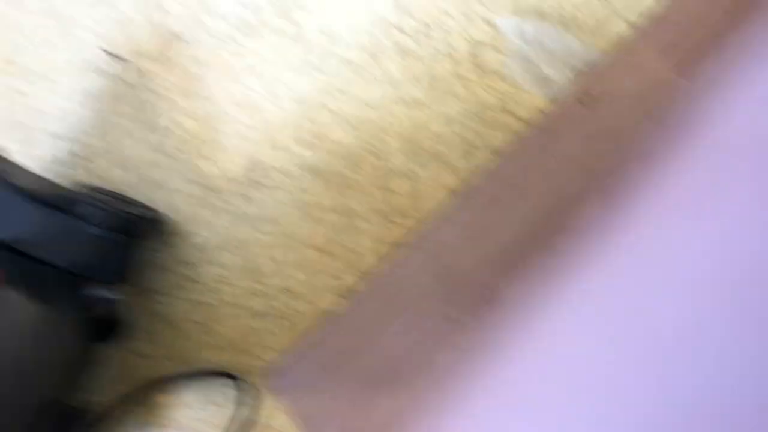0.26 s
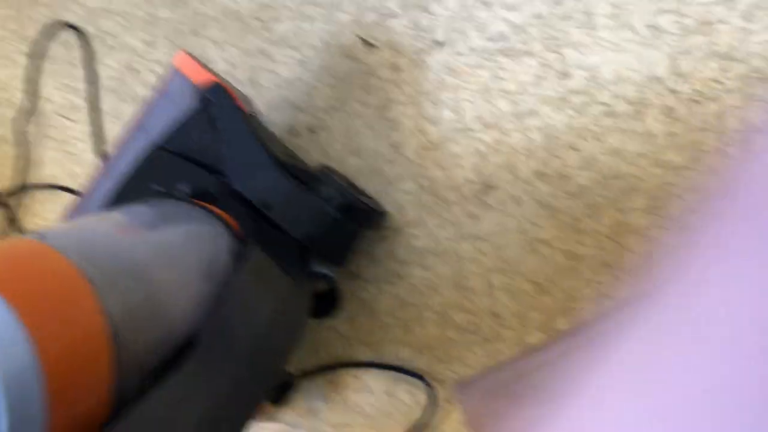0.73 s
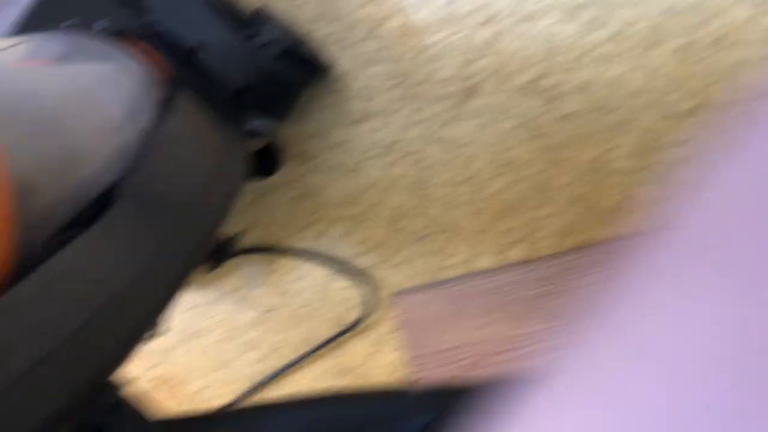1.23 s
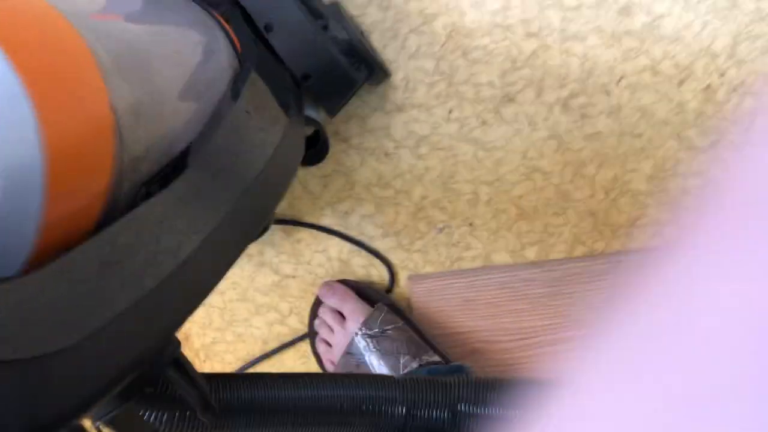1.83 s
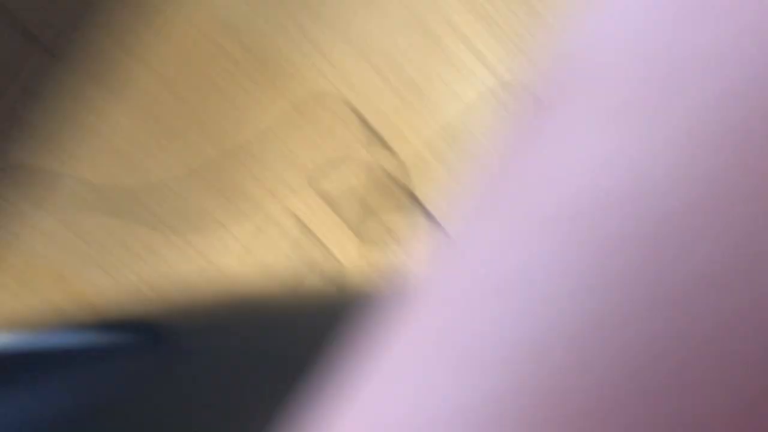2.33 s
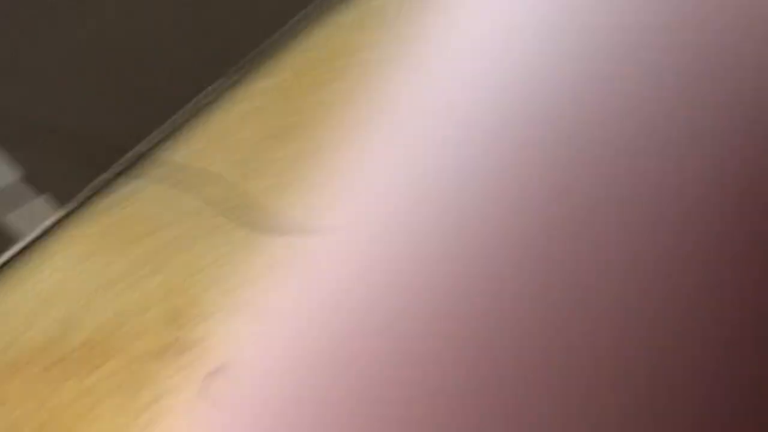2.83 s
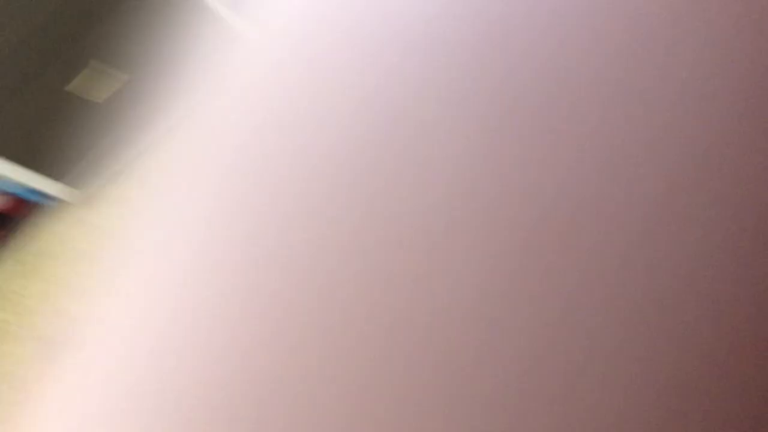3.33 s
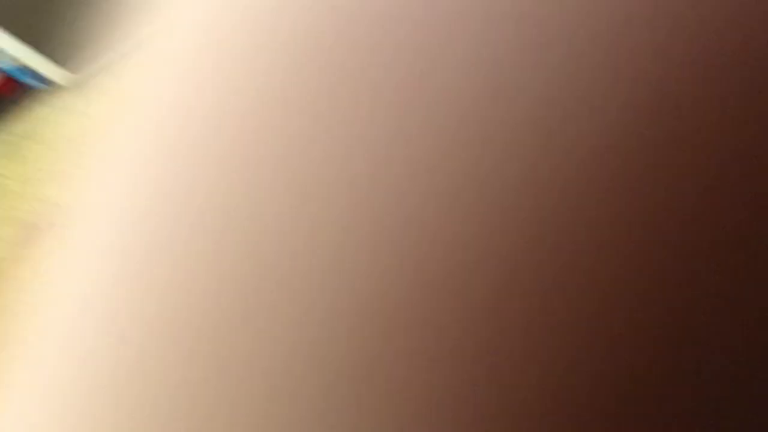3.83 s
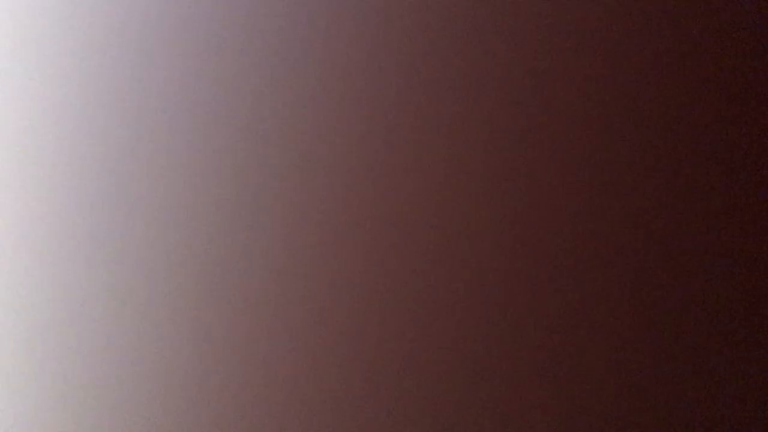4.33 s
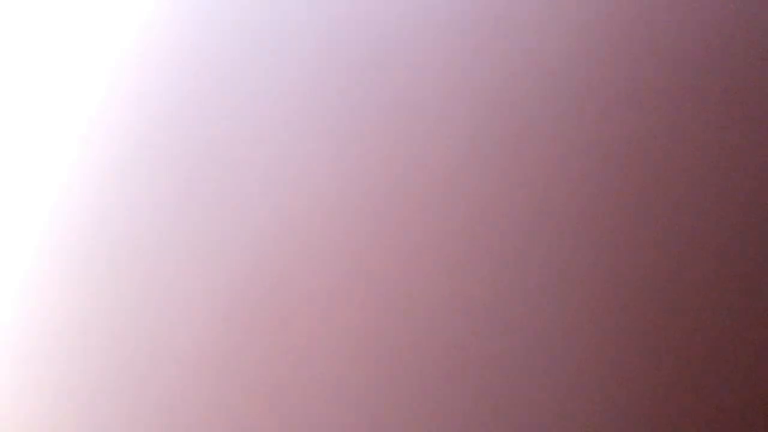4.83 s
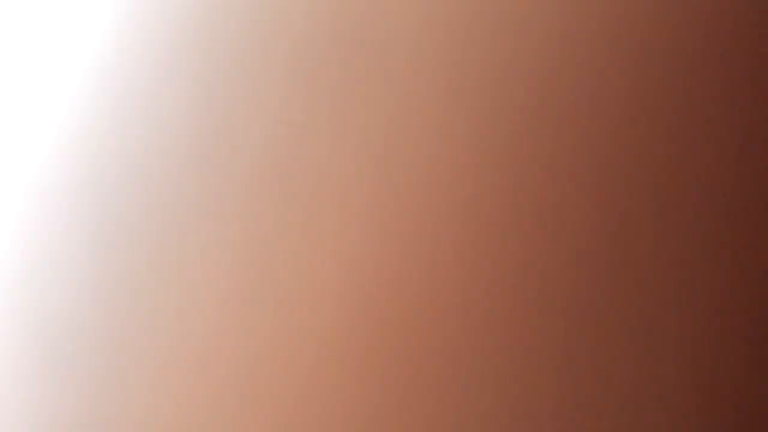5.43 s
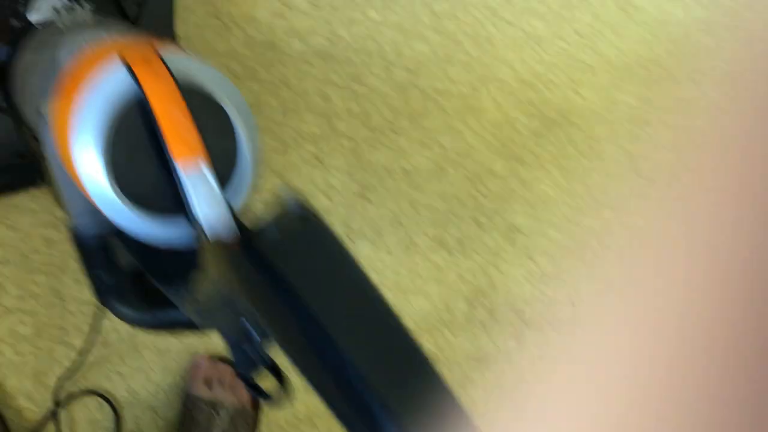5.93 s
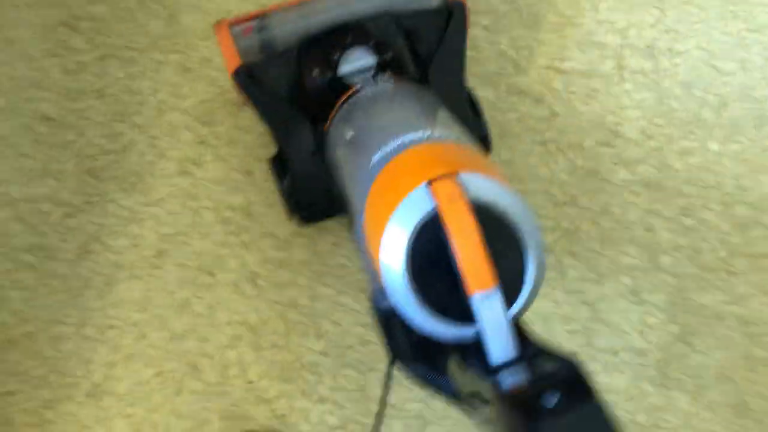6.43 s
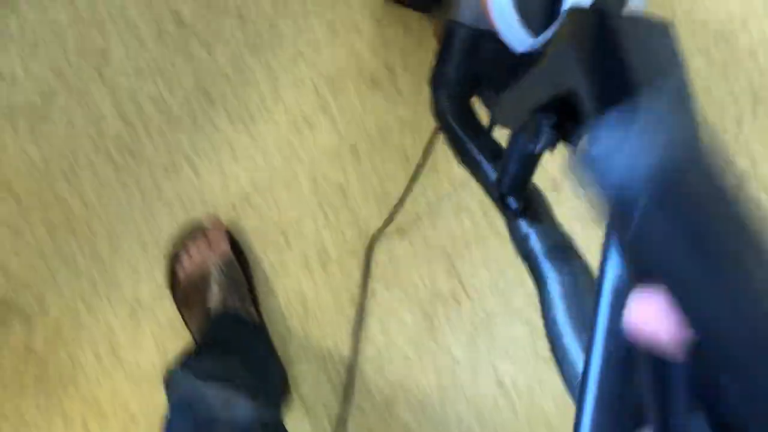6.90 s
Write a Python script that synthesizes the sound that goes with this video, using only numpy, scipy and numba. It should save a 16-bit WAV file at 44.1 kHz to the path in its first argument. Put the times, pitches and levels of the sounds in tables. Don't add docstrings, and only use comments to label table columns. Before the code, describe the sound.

Close, essentially mono sound of a vacuum cleaner already running indoors. Its motor tone swells first, with thin high whines flickering above a broad airy roar and faint rattling hum. One bright grit tick snaps inside the plastic bin. The microphone then turns into the exhaust, bringing coarse rushing hiss and hollow whistles; the handle knocks, the jet swings away, and the motor continues.

```python
import sys
import numpy as np
from scipy import signal
from scipy.fft import rfft, irfft
from scipy.io import wavfile
from scipy.ndimage import uniform_filter1d
from numba import njit

SR = 44100
rng = np.random.default_rng(int(sys.argv[2]) if len(sys.argv) > 2 else 0)


def unload_wav(signal):
    wavfile.write(
        sys.argv[1],
        SR,
        np.round(np.clip(np.atleast_2d(signal).T, -1, 1) * 32767).astype(np.int16),
    )


def nominal_scale(level):
    x = np.asarray(level, float) / 20
    return 10 ** x


N = 315756
TIME = np.arange(N) / SR
BINS_HZ = np.maximum(np.arange(N // 2 + 1) * SR / N, 1)


def curves(table):
    time_s, *columns = np.transpose(table)
    return [np.interp(TIME, time_s, column) for column in columns]


def unit(x):
    return x / np.sqrt(np.mean(x ** 2))


def walk(rate_hz):
    hold = int(SR / rate_hz)
    steps = np.repeat(rng.standard_normal(N // hold + 1), hold)
    slewed = uniform_filter1d(uniform_filter1d(steps, hold), hold)
    return unit(slewed[:N])


def bell(centre_s, half_s):
    return np.exp(-.5 * ((TIME - centre_s) / half_s) ** 2)


def swells(table, floor_db):
    bells = sum(nominal_scale(level_db) * bell(centre_s, half_s) for centre_s, half_s, level_db in table)
    return 20 * np.log10(nominal_scale(floor_db) + bells)


def fade(depth_db, rate_hz):
    return depth_db * np.minimum(walk(rate_hz), .7)


def tone(pitch_hz, level_db):
    cycles = np.cumsum(pitch_hz * np.ones(N)) / SR + rng.random()
    return np.sqrt(2) * nominal_scale(level_db) * np.sin(2 * np.pi * cycles)


@njit
def svf(x, centre_hz, width_hz):
    y, b, l = np.empty(len(x)), 0., 0.
    for i in range(len(x)):
        g = np.tan(np.pi * centre_hz[i] / SR)
        k = width_hz[i] / centre_hz[i]
        v = (b + g * (x[i] - l)) / (1 + g * (g + k))
        b, l, y[i] = 2 * v - b, l + 2 * g * v, k * v
    return y


def band(x, centre_hz, width_hz):
    centre_hz = np.clip(centre_hz, 20, .45 * SR) * np.ones(len(x))
    width_hz = width_hz * np.ones(len(x))
    return svf(svf(x, centre_hz, width_hz), centre_hz, width_hz)


# pitch_hz, density_db_per_hz
ROAR = [(25, -86), (48, -101), (90, -74.5), (170, -67), (600, -57.5), (800, -61.5), (1300, -63),
        (2400, -69), (3400, -67), (4700, -66), (6500, -70.5), (9000, -77.5), (12000, -83), (15800, -83.5)]
# time_s, nearness_db, shade_db (of hand and body)
PHONE = [(0, 0.5, 1), (.12, 0.5, 1), (.6, -0.5, 0), (1.4, 0.5, -0.5), (2.2, -2.5, 1), (2.75, 0, -3.5),
         (3.25, -3.5, -2.5), (3.6, 0, 1), (3.85, -1, -1.5), (4.3, -0.5, 3.5), (4.55, 3, 1.5),
         (5.4, 3.5, 0.5), (5.86, 2.5, 2), (6.05, -1.5, 2.5), (6.24, 1, -1.5), (6.6, 0, 1.5), (6.95, 1, 1),
         (7.16, -1.5, 4.5)]


def roar():
    octave = np.log2(BINS_HZ)
    pitch_hz, density_db = np.transpose(ROAR)
    colour = nominal_scale(np.interp(octave, np.log2(pitch_hz), density_db)) * np.sqrt(SR / 2)
    air = rfft(rng.standard_normal(N)) * colour
    near_db, shade_db = curves(PHONE)
    path_octave = np.log2([250, 1250, 3500, 11000])
    near_share, shade_share = (.23, .99, .59, .15), (-.036, -.041, .47, .94)
    drift_db_per_s = (.72, 0, 0, 0)
    reach_db = np.outer(near_share, near_db) + np.outer(shade_share, shade_db)
    reach_db += np.outer(drift_db_per_s, TIME - TIME[-1] / 2)
    out = np.zeros(N)
    for centre in np.arange(4.5, 14.6, .5):
        path_mix = [np.interp(centre, path_octave, row) for row in np.eye(4)]
        part = irfft(air * np.clip(1 - 2 * abs(octave - centre), 0, 1), N)
        flicker_db = .79 * walk(2.17) + 1.16 * walk(9)
        out += part * nominal_scale(path_mix @ reach_db + flicker_db)
    return out


HUM_HZ = (112.6, 119.9, 59.2, 1102, 225.4)
# centre_s, half_s, level_db
BELT = [(.3, 0.16, -33.5), (.8, 0.22, -36.5), (1.4, 0.14, -44.5), (2.42, 0.047, -43), (2.85, .15, -49),
        (3.55, 0.18, -41.5), (4.58, 0.1, -40), (5.2, 0.29, -44.5), (5.73, 0.12, -45), (6.7, 0.35, -40.5)]
# centre_s, half_s, level_db
MAINS = [(0, 0.17, -37), (1.15, .1, -51), (2.5, 0.27, -48), (3.2, 0.17, -45), (4.2, 0.22, -47),
         (4.87, 0.12, -46), (6.05, .15, -46), (6.85, .25, -44)]
# centre_s, half_s, level_db
BRUSH = [(.1, .2, -54), (.6, .15, -53), (1.3, .2, -56), (1.75, .15, -60), (2.58, .12, -59), (3.4, .15, -61),
         (4.85, .15, -62), (5.75, .2, -59), (6.85, .1, -60)]
# centre_s, half_s, level_db
MIX = [(.1, 0.16, -41), (1.5, 0.64, -40.5), (2.85, .1, -46), (4.3, 0.13, -42.5), (5.16, .1, -46),
       (7.05, .2, -44)]
# centre_s, half_s, level_db
BELT_TWICE = [(1.75, 0.16, -48), (2.55, 0.37, -48.5), (3.9, 0.22, -43), (4.95, 0.21, -46), (6.3, 0.19, -48)]
# pitch_hz, level_db
SIDE_LINES = [(338, -49), (429.5, -46), (604.5, -44), (869.4, -48), (1276, -49), (1707, -56)]


def hum():
    floor_db = -60
    levels_db = (swells(BELT, floor_db),
                 swells(MAINS, floor_db),
                 swells(BRUSH, -72),
                 swells(MIX, -54) + fade(2.8, 9),
                 swells(BELT_TWICE, floor_db))
    out = sum(tone(pitch_hz, level_db) for pitch_hz, level_db in zip(HUM_HZ, levels_db))
    for pitch_hz, level_db in SIDE_LINES:
        out += tone(pitch_hz + .885 * walk(3), level_db + fade(4.7, 5.5))
    return out


# time_s, level_db, centre_hz, notch_hz (of the hand's shadow, also setting the
JET = [(2.9, -38.5, 5770, 3250), (3.39, -35, 5700, 3100), (3.45, -27.5, 5300, 3000),
       (3.69, -30.5, 6500, 2880), (3.82, -28, 6400, 2800), (4.02, -28.5, 4700, 2560),
       (4.25, -34.5, 5540, 2390), (4.45, -30.5, 5500, 2420), (4.85, -30.5, 5500, 2450),
       (5.4, -29.5, 5800, 2380), (5.65, -26, 5660, 2300), (5.73, -22.5, 5300, 2500),
       (5.9, -20.5, 5600, 2700), (5.97, -25.5, 5200, 2800), (6.16, -42, 4900, 2900), (6.4, -45, 4900, 2900),
       (6.95, -28.5, 4800, 2900), (7.16, -50, 5000, 2900)]


def jet():
    level_db, centre_hz, _ = curves(JET)
    level_db = level_db - 25 * np.clip(JET[0][0] - TIME, 0, 1)
    hits = rng.random(N) < .05
    dust = hits * nominal_scale(2.5 * rng.exponential(size=N)) * rng.standard_normal(N)
    air = rng.standard_normal(N) + .22 * unit(dust)
    top_edge_hz, patch_hz = 8540, 800
    hiss = rfft(band(air, centre_hz, .89 * centre_hz)) / (1 + (BINS_HZ / top_edge_hz) ** 9)
    out = np.zeros(N)
    for k in range(1, 16):
        patch = irfft(hiss * np.clip(1 - abs(BINS_HZ / patch_hz - k), 0, 1), N)
        out += patch * nominal_scale(1.5 * walk(6))
    return unit(out) * nominal_scale(level_db)


# centre_s, half_s, centre_hz, width_hz
WHISTLE = [(3.12, .12, 13500, 2000), (3.59, .045, 10000, 6000), (4.38, .12, 13200, 2500),
           (4.5, .1, 9200, 1200), (4.7, .7, 600, 70), (4.9, .8, 172, 30), (6.5, .15, 630, 100),
           (5.15, .35, 7200, 1200), (4.57, .1, 4750, 500), (4.9, .5, 3400, 500), (6.9, .3, 10000, 4000),
           (3.55, .06, 6000, 1600), (5.85, .06, 5700, 2000), (4.12, .12, 3400, 800), (5.45, .12, 6600, 500),
           (1.45, .35, 186, 25), (3.8, .3, 1900, 600), (4.1, .12, 680, 150), (3.52, .06, 4600, 900),
           (6.35, .18, 1100, 500), (4.95, .45, 1500, 900), (5.76, .06, 3900, 900), (5.68, .1, 340, 120),
           (5.8, .08, 8200, 2000)]
WHISTLE_DB = [-52, -38, -44, -45, -34, -43.5, -32, -36, -31, -36.5, -41, -29, -25, -36, -36, -45.5, -39,
              -32, -33, -36, -38, -33, -34, -38.5]


def whistles():
    out = np.zeros(N)
    for (centre_s, half_s, centre_hz, width_hz), peak_db in zip(WHISTLE, WHISTLE_DB):
        ring = unit(band(rng.standard_normal(N), centre_hz, width_hz))
        out += nominal_scale(peak_db) * bell(centre_s, half_s) * ring
    return out


def near_echo(x):
    notch_hz = curves(JET)[2]
    from_s, to_s, ease_s = 3.1, 5.62, .076
    share = .29 * np.clip(np.minimum(TIME - from_s, to_s - TIME) / ease_s, 0, 1)
    dull = band(x, 1.7 * notch_hz, 2.6 * notch_hz)
    late = np.interp(np.arange(N) - 2 * SR / notch_hz, np.arange(N), dull)
    cancelled = svf(x, notch_hz, .3 * notch_hz)
    return x - share * (1.15 * cancelled + .5 * late)


# start_s, level_db, centre_hz, width_hz, t60_s
TICKS = [
    (1.1564, -19, 14000, 9000, .007),
    (2.2519, -11, 3800, 7000, .011),
    (2.2522, -19, 13000, 8000, .008),
    (2.2550, -22, 10500, 2500, .008),
    (2.2675, -24, 9000, 9000, .008),
    (.48, -31, 11000, 6000, .01),
]
# start_s, level_db, centre_hz, width_hz, t60_s
BUMP = [
    (5.726, -16.5, 750, 900, .28),
    (5.727, -24, 2200, 2500, .22),
    (5.738, -25, 215, 120, .35),
    (2.55, -42, 95, 50, .35),
]


def knocks(table, rise_s):
    out = np.zeros(N)
    t = np.arange(SR // 2) / SR
    for start_s, level_db, centre_hz, width_hz, t60_s in table:
        burst = unit(band(rng.standard_normal(len(t)), centre_hz, width_hz))
        envelope = (1 - np.exp(-t / rise_s)) * np.exp(-np.log(1000) * t / t60_s)
        start = int(start_s * SR)
        out[start:start + len(t)] += nominal_scale(level_db) * burst * envelope
    return out


# time_s, pitch_hz
SPEED = [(0, 489.8), (.5, 491.1), (2.6, 491.1), (2.9, 492.5), (4.3, 492.2), (6.1, 492.6), (6.4, 493.6),
         (7.16, 492.4)]
# time_s, level_db
SHAFT = [(0, -36), (.2, -34.5), (.5, -21.5), (.66, -18), (.86, -16.5), (1.11, -16.5), (2.25, -14),
         (2.41, -16.5), (2.54, -25), (3.1, -20.5), (4.27, -21.5), (5.04, -22.5), (5.13, -26.5),
         (5.32, -18.5), (5.6, -14.5), (6.62, -21.5), (6.97, -17.5), (7.16, -22)]
# centre_s, half_s, change_db
WOBBLE = [(2.597, 0.028, 0.5), (3.045, .02, -0.5), (3.1, 0.026, 2.5), (3.31, 0.033, -0.5),
          (3.55, 0.045, 0.5), (3.9, .04, -3), (4.188, 0.027, -1.5), (4.35, 0.14, 2), (4.66, .04, -2),
          (6.0, 0.051, 0.2)]
# centre_s, half_s, level_db
BLADE = [(.17, 0.043, -36.5), (.34, 0.052, -35.5), (.52, 0.045, -39), (.72, .08, -38), (.94, 0.067, -31),
         (1.05, 0.012, -40), (1.3, 0.067, -37.5), (1.46, 0.047, -34), (1.87, 0.063, -36), (2.01, .015, -42),
         (2.17, 0.02, -33), (2.31, 0.027, -33), (2.56, 0.036, -36.5), (2.71, 0.05, -41), (2.87, 0.061, -36),
         (3.17, 0.075, -39.5), (3.33, 0.049, -36), (3.58, 0.045, -37), (3.85, 0.036, -39),
         (4.17, 0.041, -38.5), (4.48, 0.062, -41), (4.75, 0.035, -40), (5.0, .15, -42.5),
         (5.14, 0.018, -37), (5.54, .02, -37), (6.24, 0.067, -39.5), (6.52, 0.087, -37), (6.68, 0.033, -40),
         (6.96, .03, -33), (7.05, .03, -36)]
# centre_s, half_s, level_db
SEVENTH = [(0.026, .03, -48), (.14, 0.027, -49), (0.41, 0.089, -40.5), (.72, .07, -42), (0.996, .04, -48),
           (1.48, 0.032, -47), (1.826, 0.055, -49), (2.03, 0.028, -42), (2.154, .04, -48),
           (2.517, 0.077, -40), (2.816, 0.093, -43), (3.095, 0.062, -41), (3.38, 0.055, -46),
           (3.6, 0.092, -44), (3.94, 0.066, -41), (4.128, 0.037, -41), (4.29, .03, -40),
           (4.617, 0.084, -46), (5.05, 0.27, -43), (5.752, 0.032, -42), (6.215, .04, -37),
           (6.54, 0.038, -36), (6.695, 0.04, -35), (6.957, .05, -43)]
# centre_s, half_s, level_db
SECOND = [(.6, .2, -45), (2.45, .08, -42), (3.02, .06, -41), (3.68, .06, -43), (4.17, .08, -39),
          (6.28, .15, -41), (6.95, .12, -40)]
# centre_s, half_s, level_db
THIRD = [(.05, .12, -42), (.75, .3, -43), (1.6, .5, -44), (2.49, .04, -46), (3.12, .1, -43),
         (6.2, .06, -42), (6.5, .15, -44)]
BETWEEN_DB = -46.5, -47, -50.5, -55
# multiple_of_shaft, level_db
FAINT_ORDERS = [(12, -56), (18, -62), (24, -64)]


def whine():
    shaft_hz = uniform_filter1d(curves(SPEED)[0], SR // 4) + .2 * walk(12)
    near_wall = 1. * (TIME > 2.5) * (TIME < 5.3)
    unsteady = uniform_filter1d(near_wall, SR // 4)
    shaft_db = curves(SHAFT)[0] + .4 * walk(9) + .6 * unsteady * walk(7)
    shaft_db += sum(change_db * bell(centre_s, half_s) for centre_s, half_s, change_db in WOBBLE)
    blade_db, seventh_db, second_db, third_db = map(swells, (BLADE, SEVENTH, SECOND, THIRD), BETWEEN_DB)
    out = tone(shaft_hz, shaft_db)
    out += tone(9 * shaft_hz, blade_db + fade(2.5, 25))
    out += tone(7 * shaft_hz, seventh_db + fade(2.5, 20))
    out += tone(2 * shaft_hz, second_db + fade(3.5, 11))
    out += tone(3 * shaft_hz, third_db + fade(3.5, 11))
    for order, level_db in FAINT_ORDERS:
        out += tone(order * shaft_hz, level_db + 3.5 * walk(7))
    return out


def scene():
    air = near_echo(roar() + jet() + whistles())
    ticks = knocks(TICKS, rise_s=.0003)
    bump = knocks(BUMP, rise_s=.005)
    mono = hum() + air + ticks + bump + whine()
    return np.array([mono, mono])


PATCH_EDGES_HZ = [4200, 4700, 5500, 6300, 7600, 8400, 9000, 10400, 11800, 12600, 13800, 14600, 15700]


def treble_patches(mono, count=48):
    side, size = np.zeros(N), 2048
    pitch_hz = np.arange(size // 2 + 1) * SR / size
    for when, where, wide in rng.random((count, 3)):
        start = 52 + 1024 * int(when * (N // 1024 - 4))
        low = int(where * (len(PATCH_EDGES_HZ) - 2))
        high = low + 1 + int(wide > .4)
        inside = (pitch_hz > PATCH_EDGES_HZ[low]) & (pitch_hz < PATCH_EDGES_HZ[high])
        scrambled = np.exp(2j * np.pi * rng.random(len(pitch_hz)))
        other = rfft(mono[start:start + size]) * inside * scrambled
        side[start:start + size] += np.hanning(size) * irfft(other, size)
    return side


def low_pass(x):
    return signal.sosfilt(signal.butter(12, 17000, fs=SR, output="sos"), x)


def record(dry):
    top_cut = signal.ellip(10, .2, 70, 15750, fs=SR, output="sos")
    mono = signal.sosfilt(top_cut, dry[0])
    side = nominal_scale(-2.5) * treble_patches(mono)
    return low_pass(np.array([mono + side, mono - side]))


dry = scene()
out = record(dry)
unload_wav(out)
```